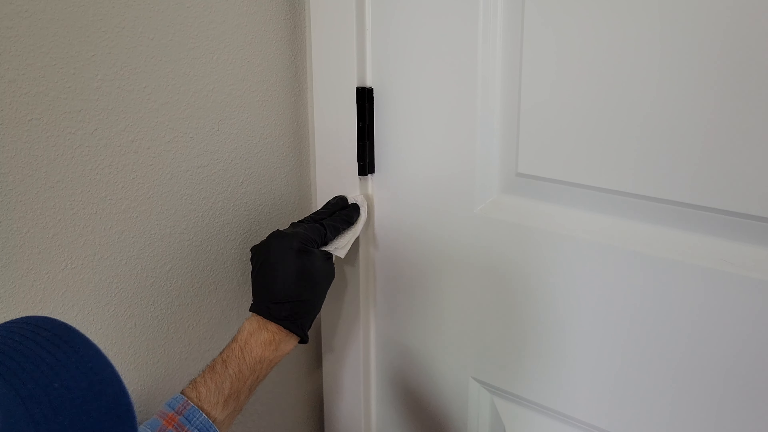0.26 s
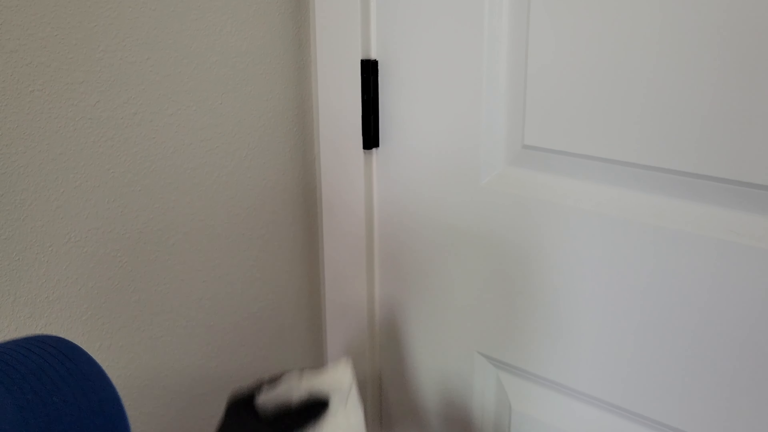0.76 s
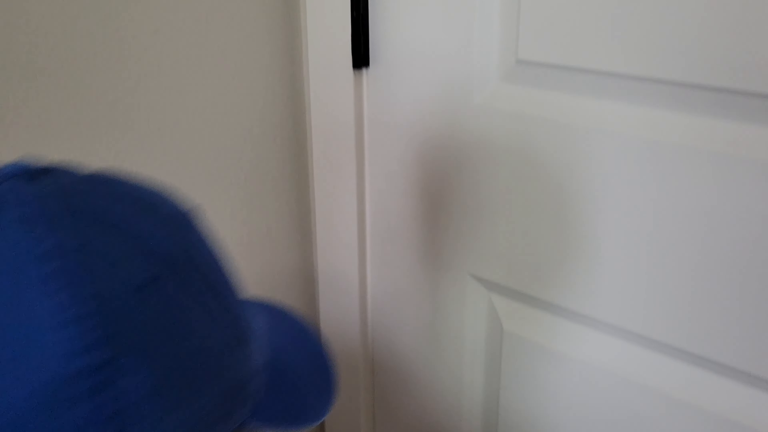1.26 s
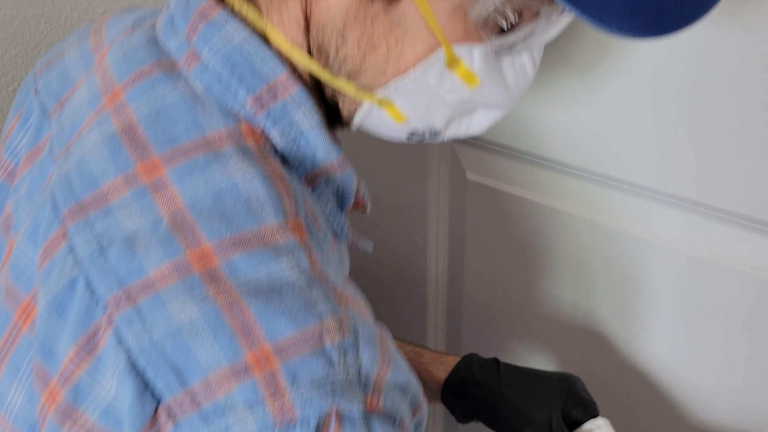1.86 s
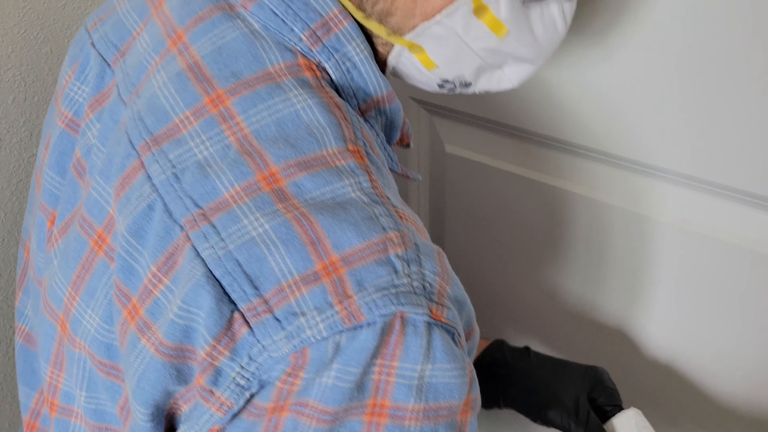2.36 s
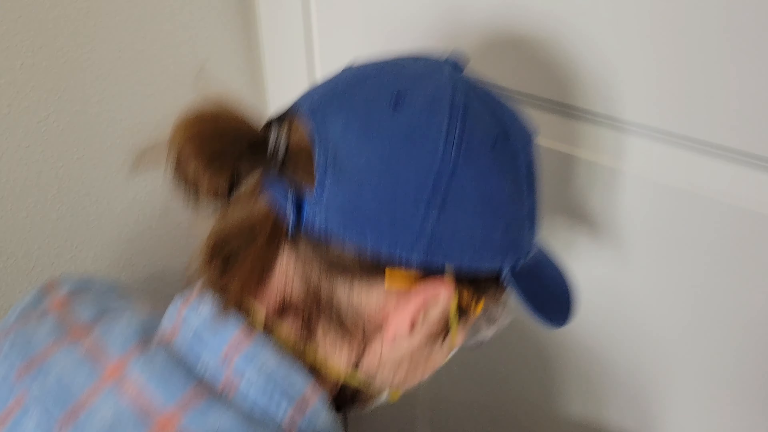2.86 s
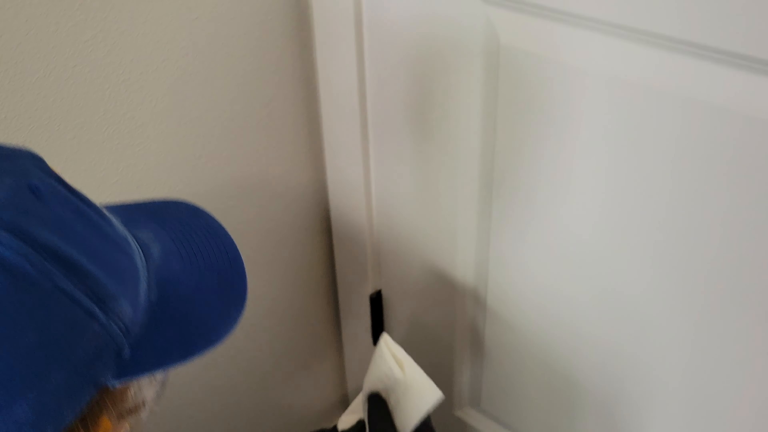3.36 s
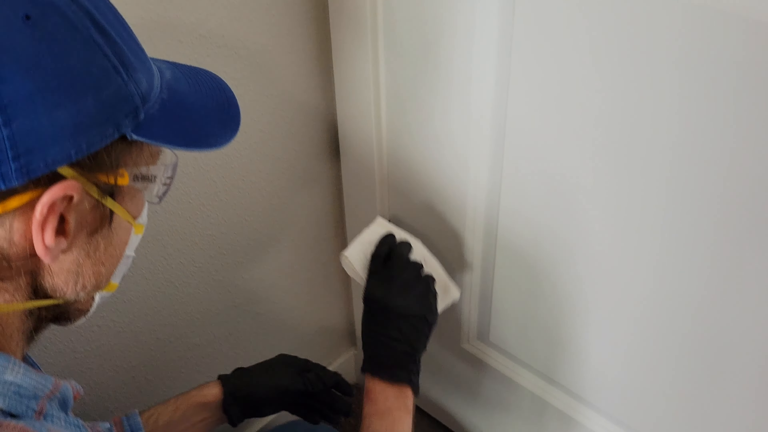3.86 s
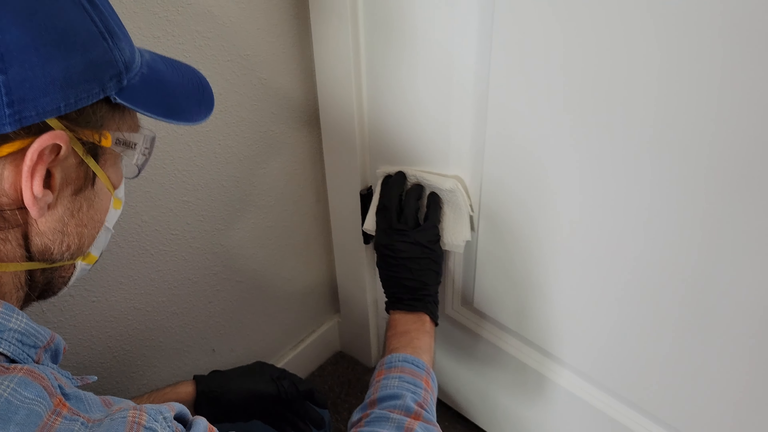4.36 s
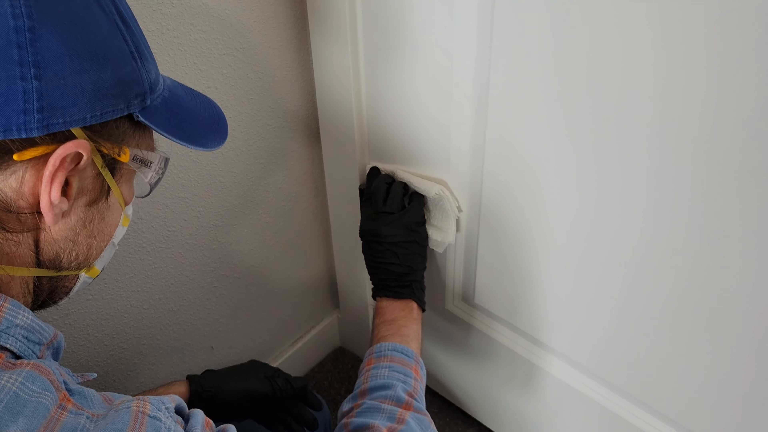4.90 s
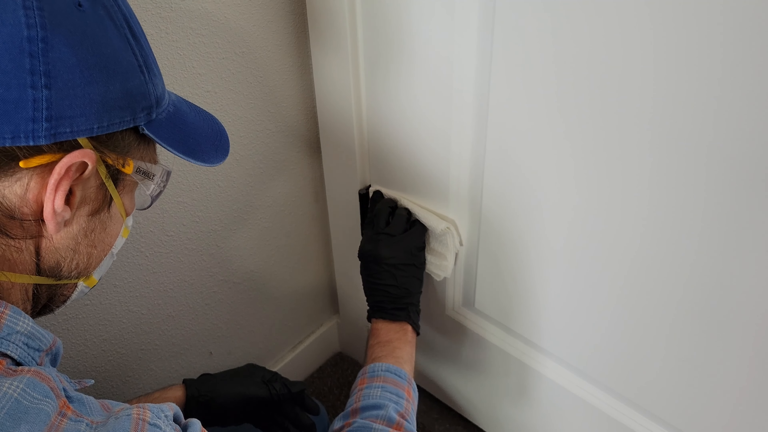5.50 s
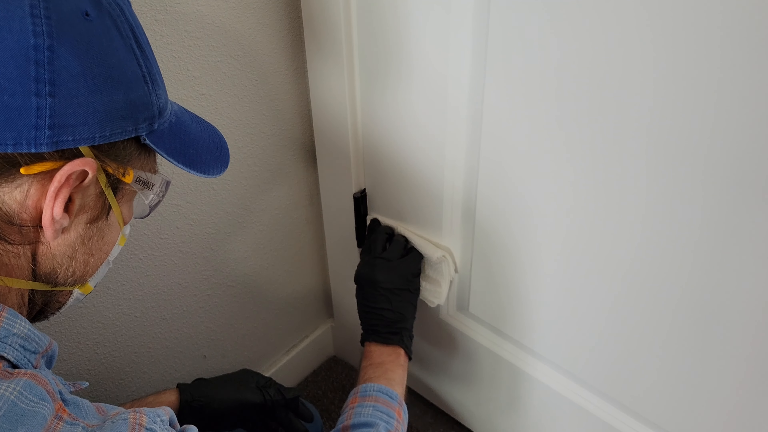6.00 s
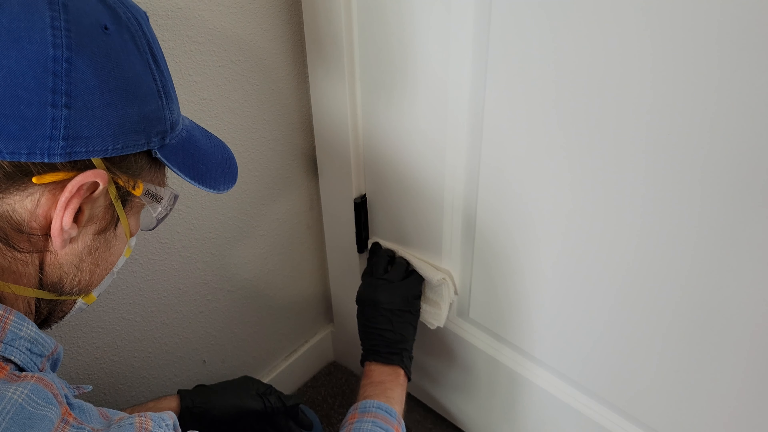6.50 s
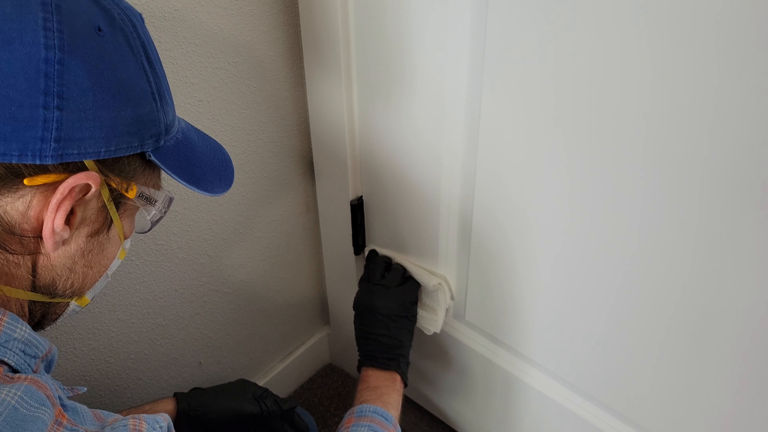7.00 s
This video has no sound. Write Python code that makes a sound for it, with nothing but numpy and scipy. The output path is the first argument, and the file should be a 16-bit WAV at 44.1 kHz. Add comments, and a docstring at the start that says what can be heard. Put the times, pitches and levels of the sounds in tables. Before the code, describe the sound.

A low ventilation rumble with a wavering hum and faint hiss runs throughout, in a small room; everything is quiet and fairly close. For the first 0.7 seconds a dry paper towel makes faint, quick, slightly squeaky strokes on a metal door hinge, with a few soft low thuds. From about 1 to 4 seconds clothes rustle and swish as someone crouches, with paper crinkles, light ticks and dull bumps. The strongest thud comes with a click near 1.75 seconds, and a short, groaning scuff against the door follows at 3 seconds. From 4.1 seconds the towel rubs another hinge in several firmer short strokes, with light taps. One long, slow, hissing pull lasts from 5 to 6.5 seconds. The wiping pauses, then a sharp little knock on hinge and door lands just before 7 seconds, followed by two more brief strokes.

```python
"""Faint, quick strokes of a dry paper towel on a door hinge, over a ventilation fan in a small room.
The worker crouches, clothes rustling amid low thuds, scuffs the door, then wipes the lower hinge with a
gloved hand: a few short strokes, one long slow pull, a pause, and a sharp knock as the hand resumes.
Sliding, snagging fibres make friction noise that the hinges colour by resonance; impacts ring damped
modes, the scuff is stick-slip motion, and the fan adds wavering tones to the rumble of its duct."""
import sys
import numpy as np
from scipy import signal
from scipy.fft import rfft, irfft
from scipy.io import wavfile

SR = 44100
rng = np.random.default_rng(int(sys.argv[2]) if len(sys.argv) > 2 else 0)


def master(y):
    """Save y as 16-bit WAV."""
    cut = np.clip(np.atleast_2d(y).T, -1, 1)
    pcm = np.round(cut * 32767)  # scale
    wavfile.write(sys.argv[1], SR, pcm.astype(np.int16))


N = 319725
TIME = np.arange(N) / SR
FREQS = np.maximum(np.fft.rfftfreq(N, 1 / SR), 1)

# low resonances of rumble and thuds: (frequency [Hz], gain [dB], t60 [s])
LOW_MODES = [(93.4, 1, 0.33), (111.3, 1.5, 0.23), (148.7, 5.5, 0.12), (217, 0, 0.079), (249, -6.5, 0.041),
             (288, -3.5, 0.19), (429, -3, 0.046), (646, 0, 0.037)]
# friction spectrum of cloth: (frequency [Hz], gain [dB])
CLOTH_SPECTRUM = [(300, 1.5), (500, 0), (700, 2.5), (950, 0), (1250, 5), (1550, 3.5), (2200, 5), (3100, 5),
                  (3700, -5), (5000, -10), (7200, -14.5), (8300, -24.5), (13500, -26.5), (15400, -27.5)]
CLOTH_EDGES_S, TOWEL_EDGES_S = (0.018, 0.032), (0.023, 0.022)  # attack, release


def from_db(db):
    """Amplitude ratio: tenfold per 20 dB."""
    return 10 ** (np.asarray(db) / 20)


def rms_one(x):
    """Normalisation to unit mean power."""
    return x / np.sqrt(np.mean(x ** 2) + 1e-20)


def in_time(rows):
    """Linear interpolation in time; the first curve, a level in dB, decays outside the rows."""
    times, level_db, *others = np.transpose(rows)
    outside_s = np.maximum(0, np.maximum(times[0] - TIME, TIME - times[-1]))
    faded_db = np.interp(TIME, times, level_db) - np.minimum(500 * outside_s, 120)
    return [faded_db] + [np.interp(TIME, times, column) for column in others]


def over_hz(points):
    """Linear interpolation over log frequency."""
    hz, value = np.transpose(points)
    return np.interp(np.log(FREQS), np.log(hz), value)


def shaped(x, gain):
    """Filtering by spectral multiplication, to unit rms."""
    return rms_one(irfft(rfft(x) * gain, N))


def butter(x, hz, kind, order=2):
    """Causal Butterworth filtering."""
    return signal.sosfilt(signal.butter(order, hz, kind, fs=SR, output="sos"), x)


def drift(per_s):
    """Random modulation of unit rms, interpolated between knots."""
    knots = rng.standard_normal(4000)
    return rms_one(np.interp(TIME * per_s, np.arange(len(knots)), knots))


def resonances(table):
    """Superposition of damped resonators: (frequency [Hz], bandwidth [Hz], gain [dB])."""
    return sum(from_db(db) / (1 + 1j * (FREQS ** 2 - hz ** 2) / (FREQS * width))
               for hz, width, db in table)


def gestures(rows, attack_s, release_s):
    """Incoherent sources add in power: envelopes of friction and of sheen, the fibres' top treble."""
    power, t = 0, TIME[::40]
    for start, length, level_db, sheen_db in rows:
        swell = .5 + .5 * np.tanh((t - start) / attack_s)
        fade = .5 + .5 * np.tanh((start + length - t) / release_s)
        power += (from_db([[level_db], [level_db + sheen_db]]) * swell * fade) ** 2
    return np.array([np.interp(TIME, t, p) for p in power])


def reflections(spots, room_t60_s=0.16, corner_db=5.5, corner_t60_s=0.2):
    """Reverberation: the corner strengthens early reflections; absorption takes the treble first."""
    t = TIME[:SR // 3]
    white = rng.standard_normal((len(spots), 2, len(t)))
    dull = butter(white, 2900, "low", order=1)
    tail = dull * from_db(-60 * t / room_t60_s) + (white - dull) * from_db(-60 * t / (0.44 * room_t60_s))
    corner = 1 + from_db(corner_db - 60 * t / corner_t60_s)
    tail = butter(tail * corner * (t > .0005), 330, "high")
    tail = tail / np.sqrt(np.sum(tail ** 2, axis=2, keepdims=True))
    return signal.oaconvolve(spots[:, None], tail, axes=2)[..., :N].sum(axis=0)


def room(spots, wet_db, wander_rad=0):
    """Multipath: direct sound arrives first on the left; moving spots blend two sets of reflections."""
    spots = np.atleast_2d(spots)
    if wander_rad:
        angle = wander_rad * np.array([drift(7) for _ in spots])
        reflected = reflections(spots * np.cos(angle)) + reflections(spots * np.sin(angle))
    else:
        reflected = reflections(spots)
    direct = sum(np.array([x, np.pad(x, (2 + k, 0))[:N]]) for k, x in enumerate(spots))
    return (direct + from_db(wet_db) * reflected) / np.sqrt(len(spots) * (1 + from_db(wet_db) ** 2))


def air(spectrum):
    """Spatial coherence: steady stereo noise, alike in the bass and diffuse in the treble."""
    # likeness of the channels: (frequency [Hz], correlation [-1..1])
    coherence = [(60, 0.96), (150, 0.99), (300, 0.66), (600, 0.8), (1200, 0.18), (4000, 0.084)]
    alike = np.clip(over_hz(coherence), -.999, .999)
    gain = from_db(over_hz(spectrum)) / (1 + (FREQS / (1.2 * spectrum[-1][0])) ** 8)
    mid, side = rfft(rng.standard_normal((2, N))) * gain
    return rms_one(irfft(np.sqrt(1 + alike) * mid + np.sqrt(1 - alike) * side * [[1], [-1]], N))


def ventilation():
    """Tonal and broadband noise: a fan beyond the wall hums, waveringly, over duct rumble and hiss."""
    # fan and mains tones: (frequency [Hz], amplitude [dB])
    tones = [(48.5, -52), (56.3, -43.5), (120, -57), (176.3, -56), (342, -69.5)]
    # duct noise spectra: (frequency [Hz], relative density [dB])
    rumble = [(15, -30), (38, -21), (49, -8), (62, 2.5), (80, -2), (95, 0), (115, 4), (130, -7.5), (152, 0),
              (190, -13.5), (222, -6.5), (290, -21), (350, -23.5), (430, -27)]
    hiss = [(300, 4), (430, -4.5), (850, 1.5), (1050, -5.5), (1230, -9), (1400, -14), (2100, -19),
            (2500, -26.5), (3200, -27), (4500, -31.5), (6600, -32), (8000, -44), (15000, -31)]
    hum = 0
    for hz, db in tones:
        amplitude = from_db(db + 2.4 * drift(2.534))
        hum += amplitude * np.sin(2 * np.pi * (hz * TIME + rng.random()) + 0.016 * drift(4.5))
    return hum + from_db(-43) * air(rumble) + from_db(-60) * air(hiss)


def resonant_rumble(swell_middle_s=1.47, swell_half_s=2.36):
    """Resonant filtering of noise: a low rumble that swells slightly during the first four seconds."""
    level_db = -56 + 4.5 / (1 + ((TIME - swell_middle_s) / swell_half_s) ** 4)
    response = resonances([(hz, 7 / t60, db) for hz, db, t60 in LOW_MODES])
    bass_band = 1 / (1 + (FREQS / 375) ** 14) / (1 + (60 / FREQS) ** 4)
    return from_db(level_db) * shaped(rng.standard_normal(N), abs(response) * bass_band)


def blows(events, modes, crack_db, crack_t60_s, vary_db):
    """Transient excitation: a short crack and freely decaying modes; a lower cut-off sounds softer."""
    out, t = np.zeros(N + SR), TIME[:SR // 2]
    hz, mode_db, t60 = np.transpose(modes)[:, :, None]
    signs = (-1) ** np.arange(len(modes))[:, None]  # neighbouring modes swing opposite ways
    rings = signs * np.sin(2 * np.pi * hz * t) * from_db(mode_db - 60 * t / t60)
    for onset_s, level_db, cutoff_hz, ring_db in events:
        ring = from_db(ring_db + rng.normal(0, vary_db, len(modes))) @ rings
        crack = from_db(crack_db - 60 * t / crack_t60_s) * rng.standard_normal(len(t))
        blow = butter(ring + crack, cutoff_hz, "low")
        blow = butter(blow, min(cutoff_hz / 1.28, 950), "high")
        start = int(onset_s * SR)
        out[start:start + len(t)] += from_db(level_db) * blow / np.std(blow[:SR // 50])
    return out[:N]


def thuds():
    """Damped low modes: soft thuds and brief swells of the rumble."""
    # thuds and swells: (time [s], level of the first 20 ms [dB], cut-off [Hz], ringing [dB])
    events = [(.067, -38.5, 118, 8), (.708, -37.5, 119, 10), (.820, -40, 118, 7), (1.409, -47.5, 328, -8),
              (1.480, -41.5, 190, 5), (1.740, -52, 450, -19), (1.759, -30.5, 223, 21),
              (2.212, -39, 125, 10), (2.335, -41.5, 192, 8), (2.93, -37.5, 179, 4), (3.02, -37.5, 260, 12),
              (3.360, -51, 220, 5), (3.826, -42.5, 150, 8), (4.011, -45.5, 250, 14), (4.152, -50, 282, -3),
              (4.272, -42, 165, -2), (4.690, -45, 126, 1), (4.961, -57.5, 700, -18),
              (6.964, -45.5, 354, -10), (6.986, -37.5, 120, 6)]
    return blows(events, LOW_MODES, crack_db=8, crack_t60_s=0.068, vary_db=1.5)


def ticks():
    """Hard impact: brief contacts with hinge and door excite higher modes."""
    # hard contacts: (time [s], level of the first 20 ms [dB], cut-off [Hz], ringing [dB])
    impacts = [(1.739, -48, 4000, -4), (1.775, -61, 1900, 7), (1.8005, -55, 1700, 2),
               (1.8315, -52, 2200, -9), (2.078, -47.5, 6040, -26), (2.819, -52, 6000, -18),
               (3.815, -50.5, 1100, -11), (4.011, -55, 1400, 6), (4.274, -52, 3000, -9),
               (4.622, -53, 3200, -9), (6.9575, -40, 3480, 0.5), (6.969, -45, 2300, -5)]
    # modes of hinge and door: (frequency [Hz], gain [dB], t60 [s])
    modes = [(487, -4, 0.079), (870, 3, 0.059), (1072, 2.5, 0.11), (1486, 8.5, 0.05), (1650, 7, 0.054),
             (1810, 8, 0.021), (2420, -3, 0.028), (2930, -3, 0.03), (4600, 0, 0.03), (6250, 0, 0.03),
             (7250, 10, 0.025)]
    return blows(impacts, modes, crack_db=15, crack_t60_s=0.032, vary_db=1)


def scuff(groan_hz=282.7):
    """Stick-slip: uneven slips rasp through resonances and, at their hardest, make the panel groan."""
    # envelopes of the judder and of the panel: (time [s], level [dB])
    rasp_envelope = [(2.9, -61), (2.945, -57), (2.97, -51), (3.005, -43.5), (3.03, -43.5), (3.055, -44),
                     (3.075, -52), (3.1, -56), (3.125, -63), (3.18, -74)]
    groan_envelope = [(2.995, -58), (3.012, -33.5), (3.025, -35), (3.05, -39), (3.068, -47), (3.088, -38),
                      (3.11, -46), (3.14, -56)]
    # resonances of the scuff: (frequency [Hz], bandwidth [Hz], gain [dB])
    peaks = [(819, 60, -11), (1250, 50, -7.5), (2270, 320, -17), (3060, 250, -19.5), (4600, 1300, -20),
             (6060, 350, -25)]
    rasp_db, = in_time(rasp_envelope)
    groan_db, = in_time(groan_envelope)
    slips_per_s = 170 * from_db(2.3 * drift(120))
    slips = rms_one(np.diff(np.floor(np.cumsum(slips_per_s) / SR), prepend=0))
    friction = slips + from_db(7) * rng.standard_normal(N)
    rasp = shaped(friction, resonances(peaks) / (1 + (FREQS / 7000) ** 4))
    pitch_hz = groan_hz * (1 + 0.051 * drift(150))
    groan = rms_one(np.sin(2 * np.pi * np.cumsum(pitch_hz) / SR))
    return from_db(rasp_db) * rasp + from_db(groan_db) * groan


def rubbing(power, colour, wood_db, snags_per_s, spread_db, snag_db, catch_db, spots=4):
    """Sliding friction: countless fibres hiss, single ones snag and snap, the grip catches unevenly."""
    level_db, top_db = 10 * np.log10(power + 1e-18)
    sheen_db = top_db - level_db
    # wood answers pressure more than speed, so its share shrinks as friction grows
    usual_friction_db = -60.5
    body_db = np.minimum(wood_db - 0.51 * (level_db - usual_friction_db), -1)
    shape = (spots, N)
    strengths = from_db(spread_db * np.minimum(rng.exponential(1, shape), 4)) * rng.choice([-1, 1], shape)
    snags = rms_one(strengths * (rng.random(shape) < snags_per_s / SR))
    fibres = rng.standard_normal(shape) + from_db(snag_db) * snags
    friction = rfft(fibres * from_db(catch_db * drift(90))) * colour
    lowpasses = [1 / (1 + (FREQS / hz) ** 14) for hz in (1400, 3800, 7500)]
    bands = np.diff(lowpasses, axis=0, prepend=0, append=1)
    body, rasp, hiss, sheen = (rms_one(irfft(friction * band, N)) for band in bands)
    hiss_db = 1.5 + 0.6 * sheen_db  # faster sliding lifts the sheen, and the hiss follows
    mix = from_db(body_db) * body + rasp + from_db(hiss_db) * hiss + from_db(sheen_db) * sheen
    return from_db(level_db) * mix


def folds(x, depth_db, per_s=8, count=16):
    """Spectral modulation: as folds open and close, narrow bands of a rustle wax and wane."""
    spectrum, centres_hz = rfft(x), np.geomspace(600, 7000, count)
    bands = (over_hz(np.column_stack([centres_hz, weights])) for weights in np.eye(count))
    return sum(irfft(spectrum * band, N) * rms_one(from_db(depth_db * drift(per_s))) for band in bands)


def drags(cutoff_hz=1170):
    """Low-pass filtering: cloth pressed flat on wood keeps only the low part of its rustle."""
    # shirt along the door: (start [s], duration [s], level [dB])
    moves = [(1.188, 0.076, -57), (2.106, 0.081, -51), (2.854, 0.3, -56.5), (3.523, 0.054, -54.5),
             (4.01, 0.045, -56)]
    power, _ = gestures([(*move, 0) for move in moves], *CLOTH_EDGES_S)
    dull = from_db(over_hz(CLOTH_SPECTRUM)) / (1 + (FREQS / cutoff_hz) ** 6)
    return np.sqrt(power) * shaped(rng.standard_normal(N), dull)


def clothes(crinkle_s=0.02):
    """Coarse friction: shirt and loose towel rustle with sparser, stronger snags."""
    # shirt and sleeve moves: (start [s], duration [s], friction [dB], relative sheen [dB])
    stirs = [(.66, 0.4, -72.5, -2.5), (.98, 3.6, -68, -6.5)]
    swishes = [(.995, 0.48, -66, -4), (1.18, 0.18, -59.5, -4.5), (1.48, 0.16, -60, -3),
               (1.61, 0.27, -65, -7.5), (1.9, 0.27, -58.5, -1.5), (1.982, 0.066, -53, -1),
               (2.115, 0.05, -51, -4), (2.18, 0.1, -65.5, -8), (2.37, 0.14, -59.5, -8.5),
               (2.52, 0.048, -61.5, -1), (2.68, 0.2, -67.5, -8), (2.81, 0.42, -57.5, -5),
               (2.93, 0.2, -52, -9.5), (3.21, 0.1, -66, -2), (3.355, 0.25, -58, -5.5),
               (3.42, 0.027, -71.5, 15.5), (3.71, 0.21, -61.5, -4), (3.755, 0.063, -54.5, -4),
               (3.99, 0.15, -65, -7)]
    # towel crinkling in the hand: (time [s], friction [dB], relative sheen [dB])
    crinkles = [(1.027, -50, -18), (1.112, -50.5, -8), (1.188, -52, -22), (1.553, -63.5, 9.5),
                (1.658, -55.5, -5.5), (2.032, -52.5, 7), (2.38, -59.5, -5), (2.811, -54, 0.5),
                (3.178, -47.5, -2.5), (3.465, -52, -8), (3.575, -51, -15)]
    shirt = gestures(stirs, *CLOTH_EDGES_S) + gestures(swishes, *CLOTH_EDGES_S)
    paper = gestures([(start, crinkle_s, db, sheen_db) for start, db, sheen_db in crinkles],
                     attack_s=0.023, release_s=0.014)
    return rubbing(shirt + paper, from_db(over_hz(CLOTH_SPECTRUM)),
                   wood_db=-1, snags_per_s=380, spread_db=3, snag_db=-1, catch_db=1.64)


def squeaks(bandwidth_hz=90):
    """Narrow resonance: paper gripping the metal sings faintly, each time at its own pitch."""
    # grips on the upper hinge: (start [s], duration [s], level [dB], frequency [Hz])
    grips = [(0.01, 0.19, -74.5, 3320), (0.27, 0.06, -68, 3260), (0.37, 0.07, -73, 3310),
             (0.6, 0.045, -69, 2780)]
    out = 0
    for start, length, level_db, hz in grips:
        power, _ = gestures([(start, length, level_db, 0)], attack_s=0.018, release_s=0.018)
        tone = signal.lfilter(*signal.iirpeak(hz, hz / bandwidth_hz, fs=SR), rng.standard_normal(N))
        out += np.sqrt(power) * rms_one(tone)
    return out


def slow_pull(colour, middle_s=5.85, crossover_s=0.34, sheen_lift_db=2):
    """The driving point weights the modes: those of the hinge's top give way to those of its bottom."""
    # pull down the lower hinge: (time [s], friction [dB], relative sheen before its lift [dB])
    envelope = [(5.0, -66, -12), (5.05, -57, -14), (5.14, -63, -14), (5.2, -57.5, -11.5),
                (5.32, -55.5, -11), (5.48, -52.5, -10.5), (5.64, -56, -10), (5.864, -54.5, -8),
                (5.922, -56.5, -12.5), (6.212, -53, -7), (6.412, -55, -10), (6.474, -60, -10.5),
                (6.53, -82, -5)]
    # hinge resonances: (frequency [Hz], bandwidth [Hz], gain at top [dB], gain at bottom [dB])
    peaks = [(1077, 57, -4, 4), (1320, 280, 0.5, -16), (1610, 100, -20, 2), (2095, 170, -4.5, -10),
             (2370, 200, -2, -18), (2670, 480, -0.5, -17), (4130, 240, -5, -2), (4830, 780, -13, -7)]
    rocking = drift(11)  # the fingers shift the pressure between top and bottom
    travelled = .5 + .5 * np.tanh((TIME - middle_s) / crossover_s + rocking)
    top = abs(0.5 + resonances([(hz, width, db) for hz, width, db, _ in peaks]))
    bottom = abs(1 + resonances([(hz, width, db) for hz, width, _, db in peaks]))
    level_db, sheen_db = in_time(envelope)
    # doubled, as each end has half of the spots of contact
    power = 2 * from_db([level_db, level_db + sheen_db + sheen_lift_db]) ** 2
    grain = dict(snags_per_s=900, spread_db=1, snag_db=-0.5, catch_db=0.5, spots=2)
    return np.vstack([rubbing(power * (1 - travelled), colour * top, wood_db=-13, **grain),
                      rubbing(power * travelled, colour * bottom, wood_db=-3.5, **grain)])


def towel():
    """Source and filter: dry paper rubs hinge and painted wood, and each hinge colours the friction."""
    # friction spectra: (frequency [Hz], gain [dB])
    upper_spectrum = [(300, -40), (500, -12), (700, -8), (1000, -13.5), (1400, -6.5), (1800, -4.5),
                      (2500, -3.5), (3600, -19), (4400, -22), (6500, -22.5), (8300, -21.5), (10000, -16.5),
                      (13500, -18), (15400, -24)]
    lower_spectrum = [(300, -4), (500, -4.5), (680, -5.5), (900, -10), (1150, -3), (1900, -5.5),
                      (2600, -5.5), (3500, -5.5), (5100, -6.5), (6500, -5), (8300, -12.5), (9800, -12.5),
                      (13500, -14), (15400, -17.5)]
    # resonances around each hinge: (frequency [Hz], bandwidth [Hz], gain [dB])
    upper_peaks = [(2360, 100, -4), (2730, 90, 6), (3270, 200, 9.5)]
    lower_peaks = [(1040, 43, -7), (1320, 370, -12), (1700, 110, -18), (2140, 96, -15), (2680, 250, -8)]
    # light contact and quick strokes: (start [s], duration [s], friction [dB], relative sheen [dB])
    upper_touch = [(0.0, 0.5, -69.5, -2.5), (.5, 0.16, -66, -2)]
    upper_strokes = [(0.0, 0.12, -63, -5.5), (.16, 0.059, -68.5, -0.5), (.27, 0.053, -64.5, -1.5),
                     (.36, 0.062, -71, -8), (.515, 0.047, -65, -9), (.595, 0.036, -69, 8)]
    lower_touch = [(4.12, 0.887, -62.5, -9.5), (6.97, .33, -64, -6)]
    lower_strokes = [(4.16, 0.15, -58, -10), (4.268, 0.022, -47, -19), (4.31, 0.076, -58, 1.5),
                     (4.455, 0.087, -62, 3.5), (4.61, 0.14, -61, 5.5), (4.69, 0.084, -58.5, -0.5),
                     (4.79, 0.04, -55, -21), (4.825, 0.13, -56.5, 0), (6.98, 0.08, -53, -9),
                     (7.185, 0.12, -54, -9)]
    upper_colour = from_db(over_hz(upper_spectrum)) * abs(1 + resonances(upper_peaks))
    lower_colour = from_db(over_hz(lower_spectrum)) * abs(1 + resonances(lower_peaks))
    upper_power = gestures(upper_touch, *TOWEL_EDGES_S) + gestures(upper_strokes, *TOWEL_EDGES_S)
    lower_power = gestures(lower_touch, *TOWEL_EDGES_S) + gestures(lower_strokes, *TOWEL_EDGES_S)
    upper = rubbing(upper_power, upper_colour,
                    wood_db=-3, snags_per_s=500, spread_db=6, snag_db=-6, catch_db=0.5)
    lower = rubbing(lower_power, lower_colour,
                    wood_db=-4.5, snags_per_s=650, spread_db=2.5, snag_db=-5.5, catch_db=1.5)
    return upper + lower + slow_pull(lower_colour)


def scene():
    """Superposition: rubbing, knocks and thuds in the room, over low rumble and the ventilation."""
    hard, soft = ticks(), thuds()
    wiping = from_db(2) * folds(room(towel(), wet_db=4.5, wander_rad=0.99), depth_db=1.5)
    wiping += room(squeaks(), wet_db=-3)
    rustle = from_db(2) * folds(room(clothes(), wet_db=3, wander_rad=0.99), depth_db=2.6)
    rustle += room(drags(), wet_db=-7)
    transients = room(hard, wet_db=-1) + room(scuff(), wet_db=-15) + room(soft, wet_db=-9)
    return wiping + rustle + transients + resonant_rumble() + ventilation()


def record(dry, cutoff_hz=15500):
    """Frequency response: each microphone adds its own colour, and a steep low-pass cuts the top."""
    # microphone balance: (frequency [Hz], left minus right [dB])
    balance = [(60, 0.5), (99, -0.5), (160, -1), (270, -1.5), (450, 0.5), (740, -1), (1220, 1), (2010, -3),
               (3320, -2.5), (5480, -1.5), (9040, 0.5), (14900, -0.5)]
    coloured = irfft(rfft(dry) * from_db(np.outer([.5, -.5], over_hz(balance))), N)
    return signal.sosfilt(signal.ellip(12, .1, 80, cutoff_hz, fs=SR, output="sos"), coloured)


dry = scene()
out = record(dry)
master(out)
```